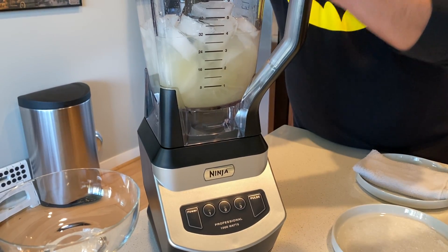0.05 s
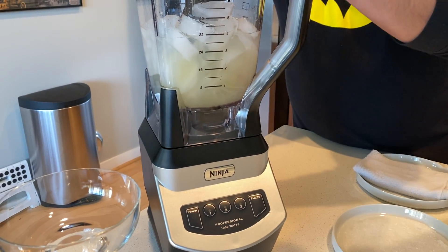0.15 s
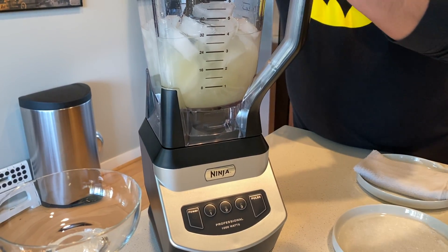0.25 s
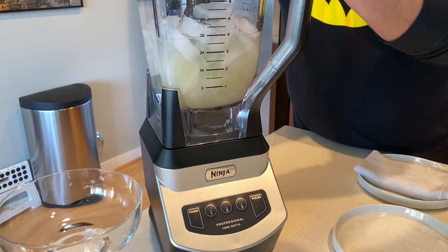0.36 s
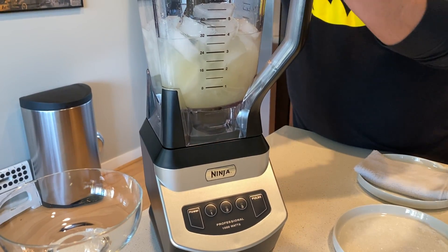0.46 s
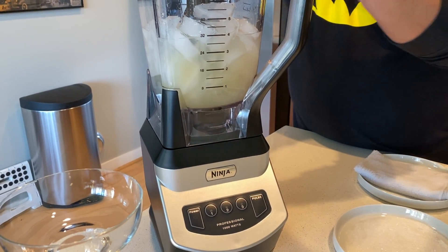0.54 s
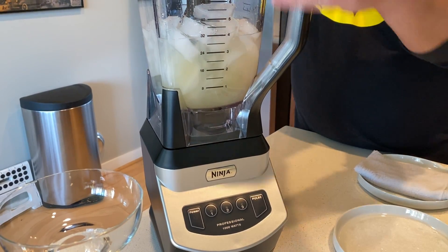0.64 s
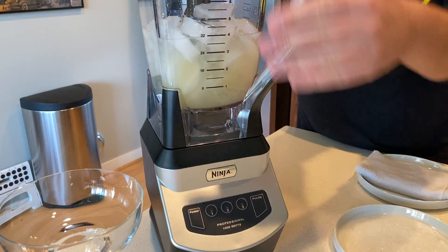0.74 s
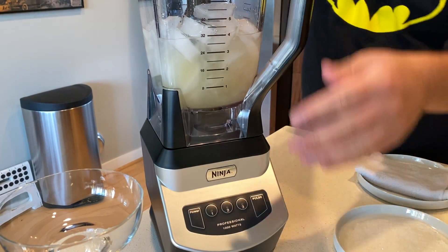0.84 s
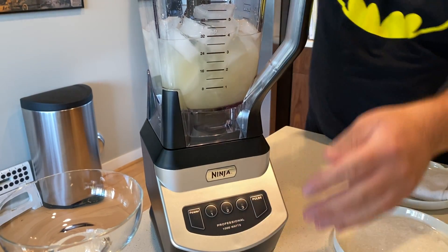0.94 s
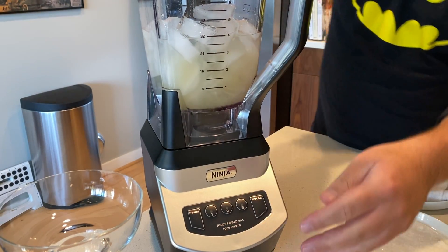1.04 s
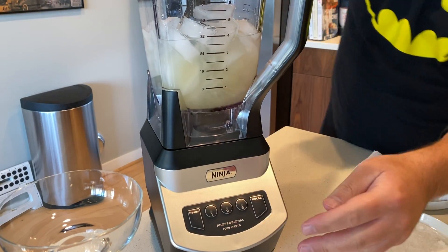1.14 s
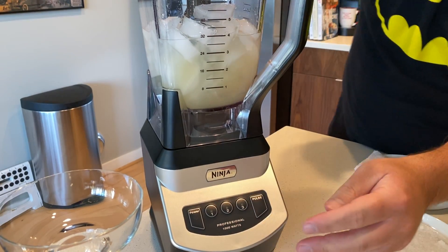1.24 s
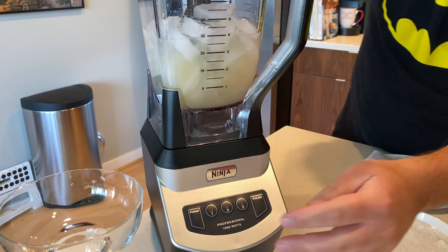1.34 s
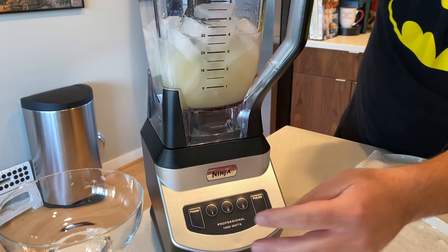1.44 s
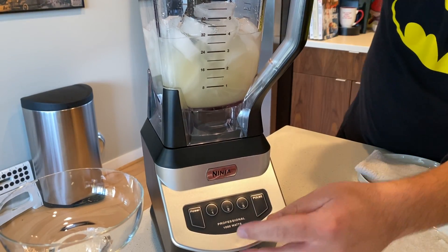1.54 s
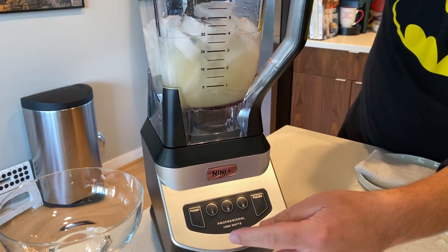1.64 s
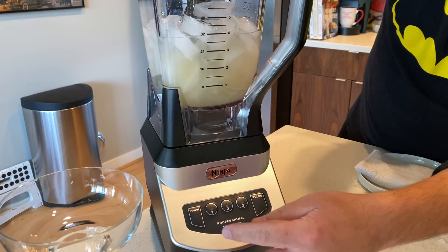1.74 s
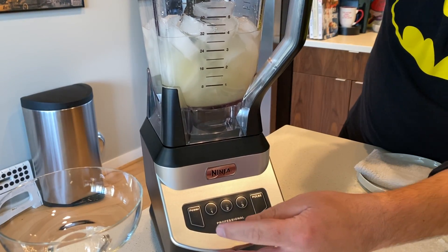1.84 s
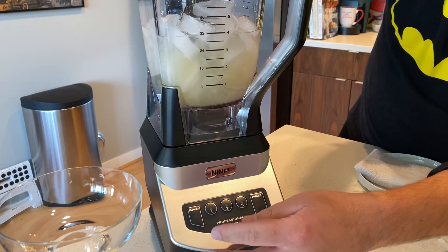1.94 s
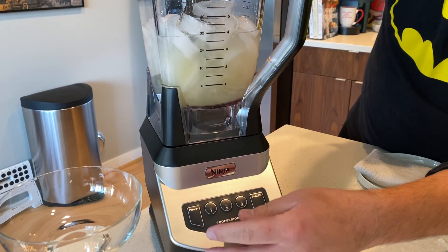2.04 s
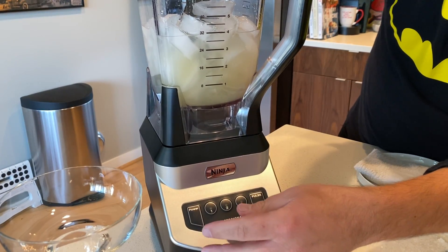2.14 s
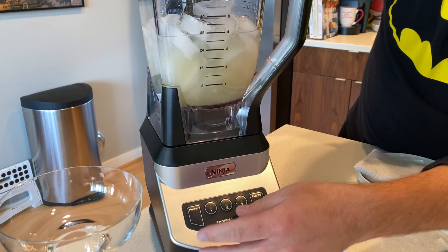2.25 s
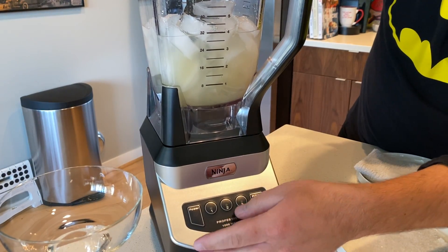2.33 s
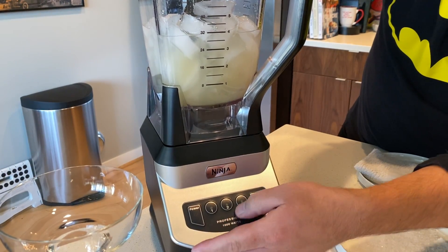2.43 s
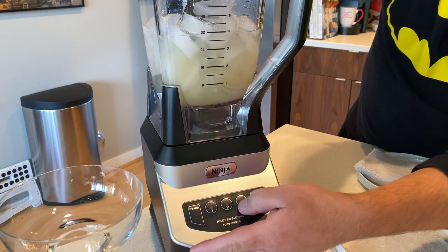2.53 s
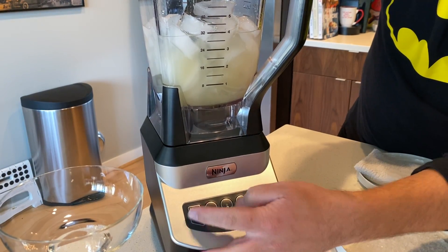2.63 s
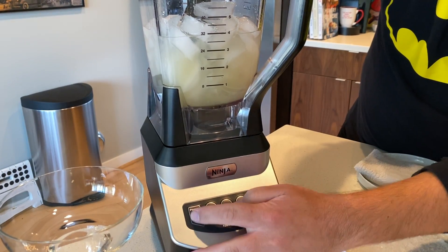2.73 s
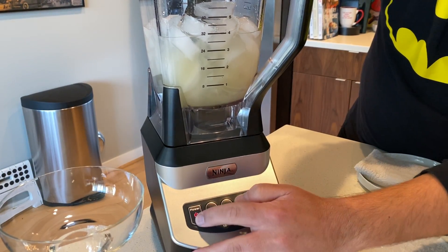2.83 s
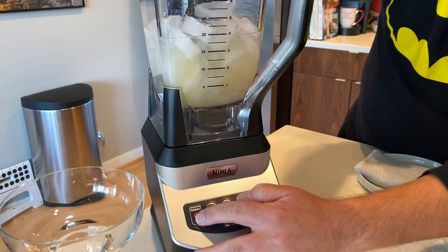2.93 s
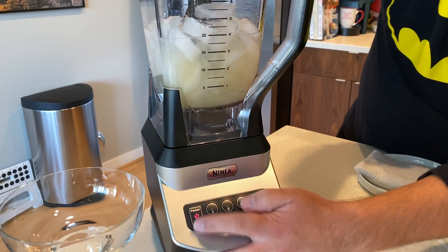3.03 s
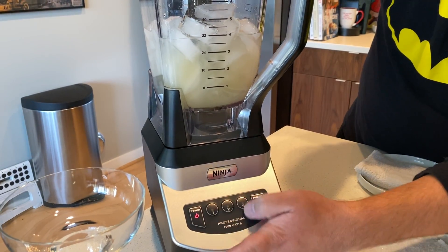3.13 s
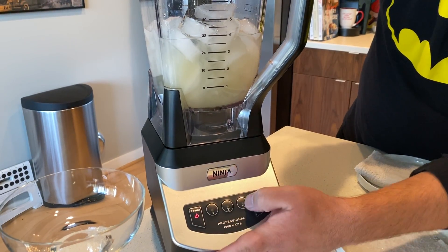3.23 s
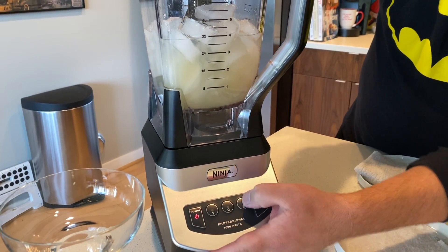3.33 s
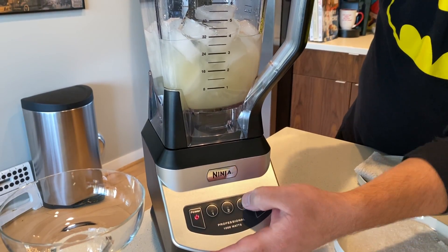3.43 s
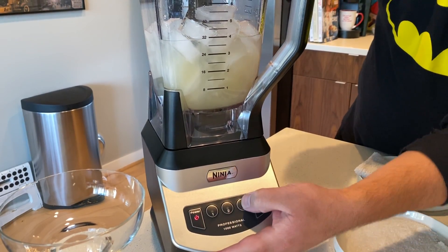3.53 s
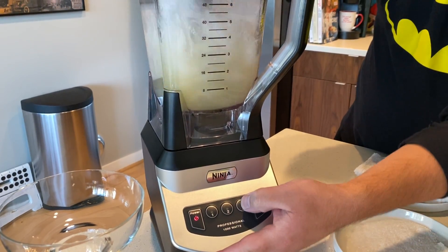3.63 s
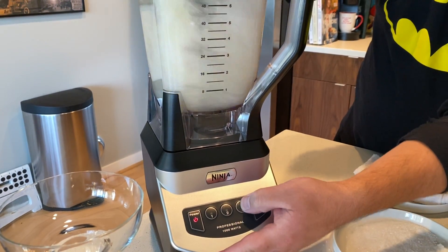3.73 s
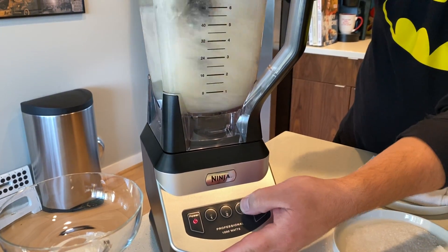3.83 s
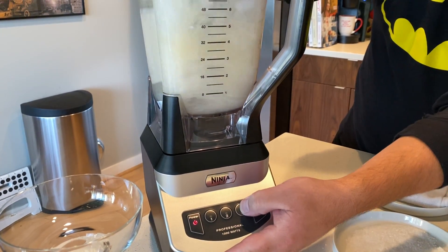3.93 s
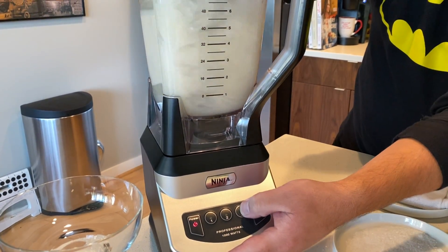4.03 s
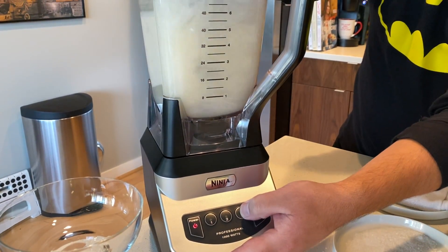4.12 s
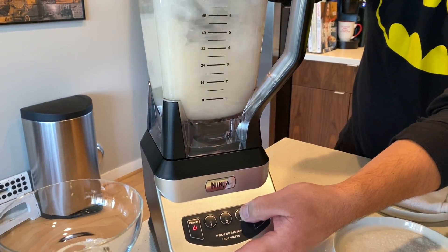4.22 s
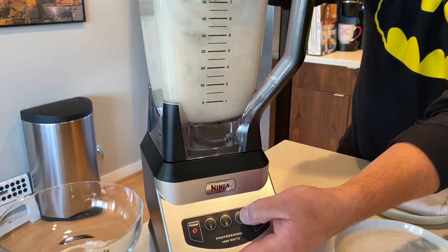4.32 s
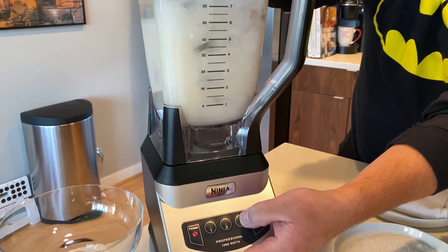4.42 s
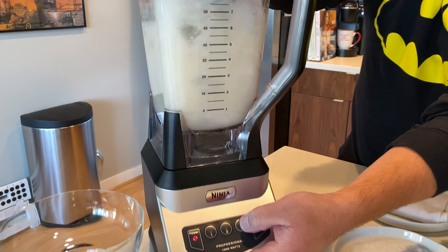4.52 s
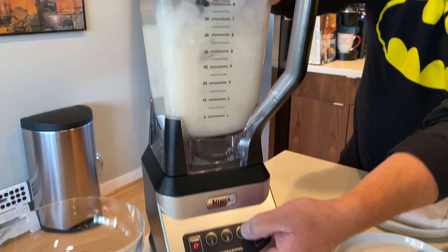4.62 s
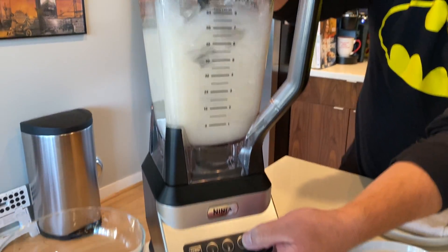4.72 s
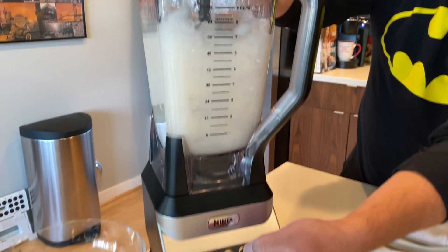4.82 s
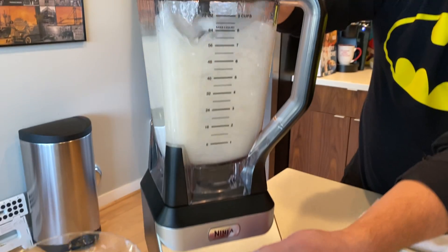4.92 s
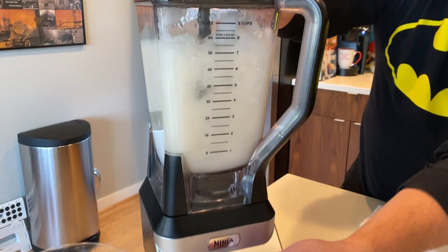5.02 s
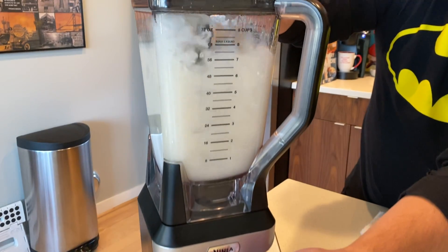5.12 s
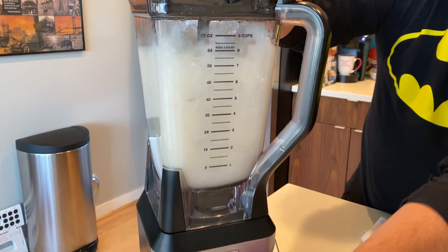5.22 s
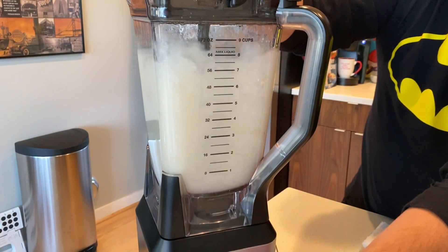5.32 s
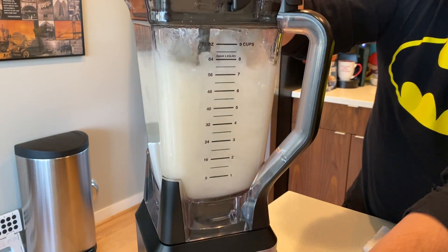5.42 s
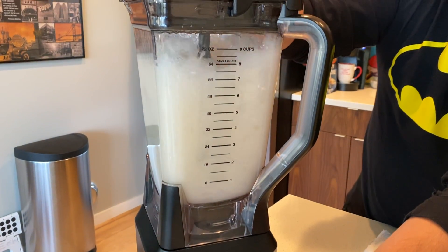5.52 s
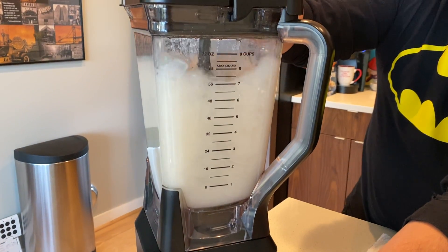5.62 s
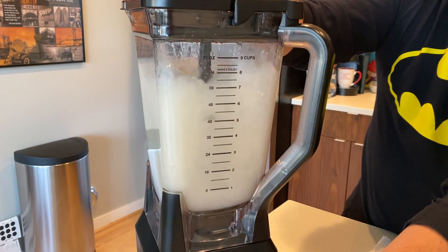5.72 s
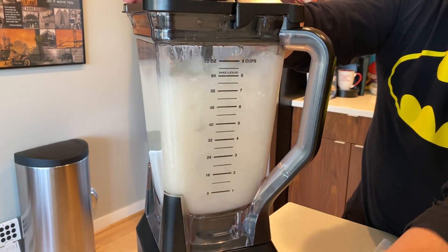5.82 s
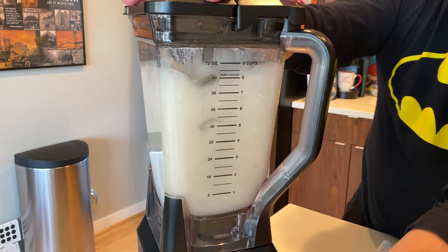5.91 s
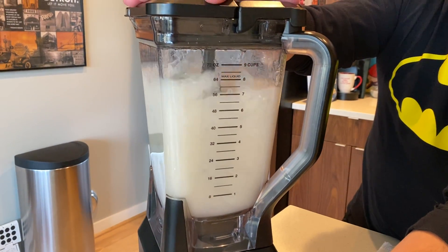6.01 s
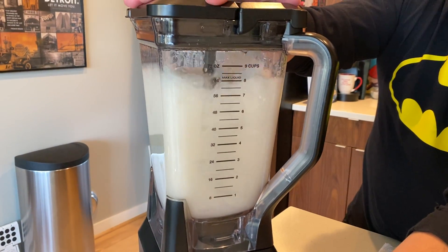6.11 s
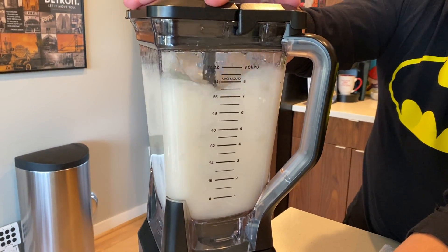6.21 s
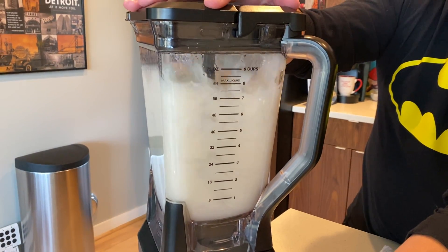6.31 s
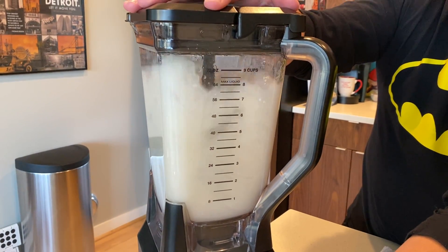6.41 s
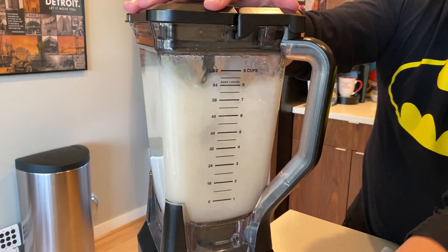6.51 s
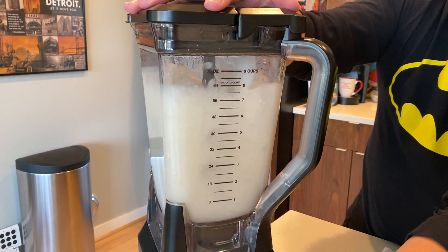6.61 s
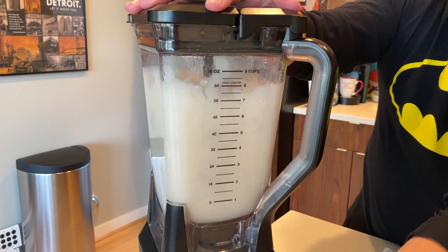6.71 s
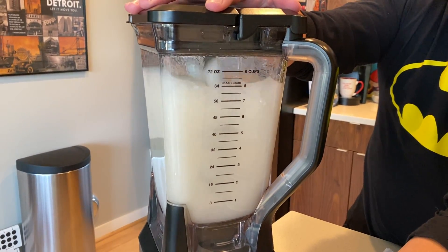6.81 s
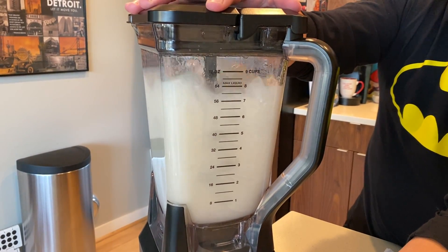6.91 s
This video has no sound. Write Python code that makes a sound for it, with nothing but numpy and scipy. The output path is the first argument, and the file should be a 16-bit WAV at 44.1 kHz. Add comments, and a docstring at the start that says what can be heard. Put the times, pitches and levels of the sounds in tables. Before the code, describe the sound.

Close stereo pickup in a lightly reverberant kitchen: cloth rustle, lid snaps, a soft plate clink and plastic button clicks with tiny hisses, over low room rumble and a distant engine. Then the blender slams on, cubes exploding against the jar. Coarse crunching thins to gritty slush, with uneven swells, hard cracks and a buzzing motor that gains speed and keeps running through the end.

```python
"""A lid scrapes and latches, cloth rustles, plates clink, buttons click with short puffs of hiss after them;
an engine drones far outside. Then a blender starts: cubes burst, and its blades grind slush, lumps and chips
(noisy impacts ringing a jar). The noise settles and the motor (shaft orders, a wavering 120 Hz hum with brief
dips, whine) gains speed as the ice gets finer. Clumps swell the grinding and hard pieces crack on the wall.
Behind: house rumble and refrigerator hum."""
import sys
import numpy as np
from scipy import signal
from scipy.fft import rfft, irfft
from scipy.io import wavfile

SR = 44100
rng = np.random.default_rng(int(sys.argv[2]) if len(sys.argv) > 2 else 0)


def store_wav(level_fs):
    """Save 16-bit WAV to argv[1]."""
    pcm = np.round(np.clip(np.atleast_2d(level_fs), -1, 1) * 32767)
    wavfile.write(sys.argv[1], SR, pcm.T.astype(np.int16))


N = 306936
T, HZ = np.arange(N) / SR, np.fft.rfftfreq(N, 1 / SR)

START_S = 3.661  # motor start
RECOVER_S = 1.02  # time constant of recovery from the ice load
# lid modes: centre_hz, width_hz, relative level_db
LID_MODES = [(706, 79, 13.5), (1328, 33, 3), (1645, 40, 9.5), (2000, 59, 5), (2260, 51, 5), (2450, 58, 1)]


def blender():
    """Motor and ice start together; ice, pieces and whine excite the room, motor tones stay dry."""
    free_hz, load_sag_hz, spin_up_s = 64.02, 9.8, .04
    jitter = .005  # rms share of speed, from the ice
    speed_hz = (free_hz - load_sag_hz * settling(RECOVER_S)) * (1 - settling(spin_up_s))
    turns = np.cumsum(speed_hz * (1 + jitter * drift(9))) / SR
    running = np.clip((T - START_S) / 0.014, 0, 1)
    noise = running * (ice(turns) + whine()) + pieces()
    return ports(kitchen(noise, wet_db=-7.5)) + running * motor(turns)


def ice(turns):
    """Blades drive slush, lumps and chips around the jar; levels fall from coarse to fine ice."""
    slush_db, lumps_db, chips_db = -33.5, -34, -27.5  # before the changes below
    coarse_slush_db, coarse_lumps_db, coarse_chips_db, coarse_s = 8, 13.5, 4, 0.14  # added at the start
    lumps_fade_db_per_s = 0.1
    coarse = settling(coarse_s)
    two_blades = 1 + .45 * np.cos(2 * np.pi * 2 * turns)
    sweep = two_blades * amp(2.2 * drift(45))  # unevenly fed

    slush = unit(band(strikes(1200, 4.3, 0.0021, 0.52, sweep), 83, 478))
    slush *= amp(slush_db + coarse_slush_db * coarse + clumps(0.81))

    lumps = unit(band(strikes(1100, 1.8, 0.0015, 0.71, sweep), 466, 1440)) * amp(lumps_db)
    lumps += unit(chunks(sweep, spread_db=2.0)) * amp(-34)
    lumps += rattle(sweep)
    fade_db = lumps_fade_db_per_s * (T - START_S)
    lumps *= amp(coarse_lumps_db * coarse - fade_db + clumps(0.16))

    chips = unit(band(strikes(1800, 3.0, 0.0041, 0.87, sweep), 1690, 15200))
    chips *= amp(chips_db + coarse_chips_db * coarse + clumps(0))

    feed = amp(0.9 * drift(22))  # ice reaches the blades in clusters
    return first_bite(sweep) + slush + lumps * feed + chips * feed ** 0.14


def first_bite(sweep):
    """A dense shower of impacts as whole cubes shatter: it sags while they last, then stops."""
    bite = unit(band(strikes(4100, 2.3, 0.0042, 0.82, sweep), 117, 16000, order=2)) * amp(-11)
    return bite * swell(START_S, 0.076, rise_db_per_s=0, sag_db_per_s=45, release_db_per_s=899)


def clumps(weight):
    """Swell in dB that clumps dragged into the blades give to ice of this weight."""
    reach = 0.36  # how far in weight a clump stirs other sizes
    # clumps: centre_s, length_s, swell_db, weight (0 light chips to 1 heavy slush)
    clump_rows = [(3.71, 0.022, 6.5, 0.07), (3.77, 0.023, 12.5, 0.58), (3.814, 0.024, 11.5, 0.38),
                  (3.91, 0.055, 8, 0.38), (4.022, 0.054, 13.5, 0.47), (4.086, 0.028, 3, 0.07),
                  (4.243, 0.055, 6, 0.48), (4.32, 0.039, 11, 0.55), (4.532, 0.026, 3, 0.86),
                  (4.725, 0.047, 5, 0.43), (5.138, 0.029, 7, 0.39), (5.159, 0.029, 8.5, 0.95),
                  (5.43, 0.18, 5, 0.54), (5.805, 0.065, 6.5, 0.48), (6.087, 0.13, 4, 0.4),
                  (6.38, 0.041, 6, 1)]
    total_db = 0
    for s, length_s, swell_db, own_weight in clump_rows:
        nearness = ((own_weight - weight) / reach) ** 2
        total_db = total_db + swell_db * np.exp(-nearness - 2 * ((T - s) / length_s) ** 2)
    return total_db


def chunks(sweep, spread_db, count=30):
    """Pieces of many sizes, each ringing for a few cycles at its own pitch."""
    per_s, low_hz, high_hz, decay_cycles = 190, 380, 2682, 9  # rate over all pitches, scaled by sweep
    out = np.zeros((2, N))
    for hz in np.geomspace(low_hz, high_hz, count):
        hit = np.flatnonzero(rng.random(N) < per_s * sweep / (count * SR))
        size = amp(spread_db * np.minimum(rng.exponential(1, len(hit)), 2))
        blows = np.zeros((2, N))
        blows[:, hit] = size * rng.choice([-1, 1], (2, len(hit)))
        out += ring(blows, [(hz, hz / (np.pi * decay_cycles), 0)]) / np.sqrt(hz)
    return jar(out)


def rattle(sweep):
    """Hard lumps of like size are batted against the wall as the blades sweep past."""
    per_s = 34  # scaled by sweep
    blows = rng.uniform(0.79, 1, N) * (rng.random(N) < per_s * sweep / SR)
    knocks = jar(contacts(blows, decay_s=0.0023, tick=0.76))
    return unit(band(knocks, 300, 2660, order=2)) * amp(-35)


def pieces():
    """Single bursts, cracks and knocks all ring the jar wall."""
    return jar(cubes() + cracks() + thumps())


def cubes():
    """Whole cubes burst at the first bite: noisy contact plus a ring of their own."""
    # bursts: hit_s, relative level_db, ring_hz
    s, db, hz = np.transpose([(3.666, -5, 854), (3.673, 2, 378), (3.683, 3, 1450), (3.6975, 3, 788),
                              (3.708, 0, 857), (3.7255, -8, 1283), (3.7375, -2, 746)])
    bursts = band(contacts(train(s, db), decay_s=0.0075, tick=0.36), 300, 12000, order=1)
    return amp(13.0) * bursts + amp(30.0) * own_rings(s, db, hz, width_hz=81)


def cracks():
    """Hard pieces flung at the wall crack, ring and splinter in the treble."""
    # cracks: hit_s, relative level_db, ring_hz, relative treble_db
    s, db, hz, treble_db = np.transpose([(3.777, -8, 1320, -22), (3.8135, -5.5, 1700, -28),
                                         (3.878, -7, 1470, -25), (3.917, -5, 2500, -30),
                                         (4.099, -14, 2480, -28), (4.132, -15, 2400, -28),
                                         (4.254, -13.5, 2520, -20), (4.3297, -10, 2570, -24),
                                         (4.6673, -10, 2100, -10.5), (4.788, -15, 2500, -28),
                                         (4.9673, -16, 2110, -10), (4.994, -10.5, 2166, -15),
                                         (5.117, -8, 2000, -23), (5.2389, -12, 2130, -29),
                                         (5.3419, -11, 2180, -33), (5.4143, -4, 2190, -17),
                                         (5.435, -13, 2100, -18), (5.471, -8.5, 2100, -24),
                                         (5.482, -13, 2650, -26), (5.6369, -11.5, 2260, -24),
                                         (5.8243, -9.5, 1870, -13), (5.8475, -13, 1990, -23),
                                         (5.931, -17, 2350, -12.5), (6.0974, -19, 1600, -32),
                                         (6.3908, -9, 2460, -13), (6.4071, -6, 2250, -7),
                                         (6.4297, -13, 2760, -26), (6.833, -15, 2240, -31),
                                         (6.861, -15, 3100, -15)])
    body = amp(18.5) * contacts(train(s, db), decay_s=0.0033, tick=0.35)
    body += amp(26) * own_rings(s, db, hz, width_hz=170)
    splinters = amp(23) * contacts(train(s, treble_db), decay_s=0.0025, tick=0.28)
    return band(body, 570, 14000, order=1) + band(splinters, 4700, 14000, order=2)


def thumps():
    """Big lumps bump the wall: a longer crumble and a pitched knock."""
    # bumps: hit_s, relative level_db, knock_hz
    s, db, hz = np.transpose([(3.83, 2, 507), (3.891, 0.5, 1386), (3.925, -3.5, 444), (4.014, 2, 1410),
                              (4.034, 0, 1355), (4.07, -2, 460), (4.213, -2, 1280), (4.235, -8, 457),
                              (4.279, -1.5, 355), (4.304, -5, 876), (4.333, -1, 454), (4.466, -4.5, 434),
                              (4.539, -3, 444), (4.698, -3.5, 347), (4.745, -3, 435), (4.99, -5.5, 334),
                              (5.054, -5.5, 361), (5.116, -5.5, 342), (5.118, -5, 1250), (5.146, -11, 820),
                              (5.787, -5.5, 840), (5.807, -6, 696), (5.901, -7, 700), (6.049, -15, 785),
                              (6.087, -5, 825), (6.099, -4, 1614), (6.351, -3.5, 254), (6.533, -5.5, 1080),
                              (6.712, -10, 327)])
    bumps = band(contacts(train(s, db), decay_s=0.015, tick=0.61), 360, 1800, order=2)
    return amp(12.5) * bumps + amp(28.5) * own_rings(s, db, hz, width_hz=43)


def strikes(per_s, spread_db, decay_s, tick, sweep):
    """Pieces of random size hit the jar, more often as a blade sweeps past."""
    size = amp(spread_db * np.minimum(rng.exponential(1, N), 4))
    hit = rng.random(N) < per_s * sweep / SR
    return jar(contacts(size * hit, decay_s, tick))


def jar(x):
    """The wall rings a little; the slush inside damps it."""
    # wall modes: centre_hz, width_hz, relative level_db
    wall_modes = [(369.5, 46, -15), (432, 38, -8), (558, 8.9, -4), (703, 7.8, -5.5), (780, 270, -6),
                  (883, 9.7, -14), (1295, 70, -11.5), (1430, 31, -7), (2170, 41, -9.5), (2686, 200, -16.5),
                  (3190, 44, -6), (3950, 290, -6.5)]
    # response of the filled jar: freq_hz, relative density_db (per Hz)
    jar_response = [(30, -93), (90, -11.5), (220, 2.5), (420, -1), (620, -5.5), (850, -3), (1750, -3),
                    (2500, 0.5), (3500, -5), (6500, -7.5), (9500, -11), (11000, -15.5), (13000, -31.5),
                    (15500, -33)]
    return colour(x + ring(x, wall_modes), jar_response)


def motor(turns):
    """Shaft orders shaken by the ice, plus a wavering, dipping magnetic hum at twice the mains rate."""
    hum_hz, hum_db, waver_db, dip_s, wander_rad = 120, -35.5, 2.5, 0.043, 0.1
    roughness = 0.41  # shaken part of each order
    # shaft orders: multiple of shaft rate, level_db
    shaft_orders = [(2, -50), (4, -33.5), (5, -39.5), (6, -47.5), (11, -49.5), (14, -47), (34, -47),
                    (36, -54), (43, -43), (53, -53)]
    # brief dips of the hum: centre_s, depth_db
    hum_dips = [(4.04, -14), (4.43, -16), (4.89, -10), (5.751, -3), (6.25, -19), (6.491, -6), (6.92, -18)]
    shaft = 0
    for k, db in shaft_orders:
        steady = np.sin(2 * np.pi * (k * turns + rng.random()))
        shaken = roughness * drift(21) * np.cos(2 * np.pi * (k * turns + rng.random()))
        shaft = shaft + amp(db) * (steady + shaken)
    shaft *= 1 - 1.06 * settling(RECOVER_S)  # tone firms up as the load evens out

    phase = 2 * np.pi * hum_hz * T + wander_rad * drift(16)
    wave = np.sin(phase) + amp(-18.0) * np.sin(3 * phase)
    dips_db = sum(db * np.exp(-((T - s) / dip_s) ** 2) for s, db in hum_dips)
    hum = amp(hum_db + waver_db * drift(17) + dips_db) * wave
    return shaft * amp([[.5], [-.5]]) + hum * amp([[-1.1], [1.1]])  # left, right dB


def whine():
    """Cooling-fan air rings the housing at a fixed pitch, louder as the motor gains speed."""
    air = ring(rng.standard_normal((2, N)), [(2680, 170, 0)])
    return unit(air) * amp(-40.5) * (1 - settling(RECOVER_S))


def handling():
    """Lid, buttons, plates and hiss: hiss and scrape stay dry, knocks excite the room."""
    knocks = lid_latches() + button_clicks() + plate_clinks()
    return rustle_and_hiss() + lid_scrape() + kitchen(knocks, wet_db=-8.5)


def lid_scrape():
    """The lid judders on its rim in random slips that ring its modes, then comes to rest."""
    slips_per_s = 760
    slips = rng.random(N) * (rng.random(N) < slips_per_s / SR)
    slips = contacts(slips, decay_s=0.0023, tick=0.67)
    scrape = unit(band(ring(slips, LID_MODES) + amp(-6) * slips, 1060, 2150, order=2)) * amp(-41)
    return scrape * swell(0, 0.085, rise_db_per_s=0, sag_db_per_s=98, release_db_per_s=123)


def lid_latches():
    """The lid snaps into place, each contact ringing its modes."""
    # latches: hit_s, relative snap_db, thud_db, treble_db
    latch_rows = [(.188, -49, -72, -49), (.206, -52, -38, -72), (.2474, -47, -33.5, -38.5),
                  (.2995, -31.5, -30, -33), (.312, -45, -47, -54), (.6775, -42.5, -59, -56),
                  (.868, -56.5, -51, -69), (1.163, -62, -44, -75), (1.193, -51, -53, -75),
                  (1.236, -60, -52, -60)]
    return clicks(latch_rows, LID_MODES, lowest_hz=660, decay_s=0.0048, noise_db=1, level_db=25.5)


def button_clicks():
    """Fingers and buttons knock the base; each click adds a ring at its own pitch."""
    # clicks: hit_s, relative snap_db, thud_db, treble_db, then ring_hz
    button_rows = [(2.531, -48, -62, -69, 1690), (2.7323, -54.5, -64, -61, 2150),
                   (2.881, -33.5, -34, -59, 1777), (3.082, -55, -37.5, -67, 825),
                   (3.493, -57, -74, -63, 2200), (3.548, -25.5, -27, -63, 1925),
                   (3.6053, -38, -33, -39.5, 500)]
    # housing modes: centre_hz, width_hz, relative level_db
    base_modes = [(256, 24, 15), (488, 35.5, 16.5), (1276, 28, 13), (2205, 42, 10), (2660, 55, 6),
                  (3480, 93, 1), (4280, 79, -5)]
    knocks = clicks(button_rows, base_modes, lowest_hz=212, decay_s=0.0072, noise_db=-2.5, level_db=27.5)
    s, snap_db, thud_db, _, hz = np.transpose(button_rows)
    return knocks + amp(38.0) * own_rings(s, np.maximum(snap_db, thud_db), hz, width_hz=51)


def plate_clinks():
    """Plates on the counter touch lightly and ring their modes."""
    # touches: hit_s, relative level_db
    clink_rows = [(1.9156, -32), (1.959, -29)]
    # plate modes: centre_hz, width_hz, relative level_db
    plate_modes = [(1950, 82, 1), (2182, 54, 5), (2950, 90, -18)]
    return amp(10.5) * band(ring(train(*np.transpose(clink_rows)), plate_modes), 1500, 3000)


def clicks(rows, modes, lowest_hz, decay_s, noise_db, level_db):
    """Plastic parts meet: a thud and a snap ring their modes, with a thin tick on top."""
    s, snap_db, thud_db, treble_db, *_ = np.transpose(rows)
    thud, snap = train(s, thud_db), train(s, snap_db)
    low = band(thud, lowest_hz, 1040, order=2)
    high = band(snap, 1470, 4600, order=2)
    ringing = ring(low + high, modes)
    body = band(contacts(thud, 0.017, 0.14), lowest_hz, 1800, order=3)
    crack = band(contacts(snap, decay_s, 0.076), 1340, 4440, order=2)
    treble = contacts(train(s, treble_db), decay_s, 0.92)
    treble = band(treble, 4300, 10600, order=4) * amp(-1.0)
    return amp(level_db) * (ringing + amp(noise_db) * (body + crack) + treble)


def rustle_and_hiss():
    """Gated noise, mixed from a dull uneven part and a bright even one."""
    rise_db_per_s, sag_db_per_s, release_db_per_s = 250, 8, 162
    # hiss rows: the early ones cloth rustle, the later ones short puffs of background hiss following clicks
    # full_strength_s, length_s, relative level_db, brightness (0-1)
    hiss_rows = [(0, 0.011, -45.5, 0), (0.308, 0.26, -51, 0.5), (0.635, 0.07, -52.5, 0.6),
                 (1.128, 0.31, -56.5, 0.48), (1.494, 0.32, -65, 0.63), (2.416, 0.057, -72, 0.27),
                 (2.542, 0.04, -56.5, 0.24), (2.74, 0.1, -59.5, 0.8), (2.893, 0.032, -55.5, 0.02),
                 (3.09, 0.025, -60, 0.75), (3.24, 0.035, -58.5, 0.77), (3.368, .05, -60, 0.6),
                 (3.557, 0.056, -53, 0.4)]
    # hiss spectrum: freq_hz, relative density_db (per Hz)
    hiss_spectrum = [(300, 7.5), (750, -3), (1100, -8), (2000, -7.5), (2600, -5.5), (3100, -9.5),
                     (5800, -9), (8000, -10.5), (10500, -13), (11600, -18), (13000, -44)]
    grain = rng.standard_normal((2, N)) * amp(1.0 * drift(70))
    dull = unit(band(unit(colour(grain, hiss_spectrum)), 190, 4700, order=2))
    fizz = colour(rng.standard_normal((2, N)), hiss_spectrum)
    fizz = unit(band(fizz, 2500, 16000, order=1))
    bright_power = dull_power = 0
    for s, length_s, db, brightness in hiss_rows:
        gain = amp(db) * swell(s, length_s, rise_db_per_s, sag_db_per_s, release_db_per_s)
        bright_share = np.clip(brightness, 0, 1) ** 2
        bright_power += gain ** 2 * bright_share
        dull_power += gain ** 2 * (1 - bright_share)
    return dull * np.sqrt(dull_power) + fizz * np.sqrt(bright_power) * amp(-7.0)


def engine():
    """A far engine through the walls: low orders, loosely in step, and a boom throbbing once a cycle."""
    scatter_turns = 0.32  # widest phase offset of an order
    # engine course: time_s, cycle_hz, relative level_db of the orders, boom_db (sixth order)
    engine_rows = [(0, 28.23, -9, -37), (.2, 28.75, 1.5, -37), (.27, 29.06, 4, -35), (.55, 29.43, 6.5, -37),
                   (.66, 29.13, 6.5, -46), (.73, 29.42, 7, -49), (.79, 29.14, 6, -36),
                   (.92, 29.5, 7.5, -55), (1.4, 30.34, 5, -55), (1.9, 30, 6, -62), (2.35, 29.71, -2.5, -55),
                   (3, 29.95, -4.5, -67)]
    # exhaust orders: multiple of cycle rate, relative level_db
    exhaust_orders = [(2, -56.5), (3, -61), (4, -63), (5, -59), (7, -56), (8, -57), (9, -60), (10, -65),
                      (12, -58), (14, -63.5)]
    cycle_hz, level_db, boom_db = curves(engine_rows)
    turns = np.cumsum(cycle_hz * (1 + 0.003 * drift(9))) / SR
    orders = 0
    for k, db in exhaust_orders:
        gain = amp(db + level_db + 2.0 * drift(4.3))
        orders = orders + gain * np.cos(2 * np.pi * (k * turns + scatter_turns * rng.random()))

    sixth, fourteenth = np.sin(2 * np.pi * 6 * turns), np.sin(2 * np.pi * 14 * turns)
    boom = sixth + amp(-20.5 + 6.1 * drift(8.6)) * fourteenth
    boom *= amp(boom_db + 2.0 * drift(22))
    boom *= 1 + 0.56 * np.cos(2 * np.pi * turns)
    return (orders + boom) * amp([[-1], [1]])  # left, right dB


def floor():
    """Dull house rumble as coloured noise, and wavering refrigerator tones."""
    # refrigerator hum: tone_hz, mean level_db
    fridge_tones = [(59.3, -51), (119.6, -55.5)]
    # rumble spectrum: freq_hz, relative density_db (per Hz)
    rumble_spectrum = [(25, -3), (40, -24), (56, 2.5), (80, -4), (120, -1), (250, -10.5), (420, -7.5),
                       (480, -20), (800, -27.5), (1200, -33.5), (2000, -38), (2600, -39.5), (3500, -51),
                       (14000, -69)]
    hum = 0
    for hz, db in fridge_tones:
        hum = hum + amp(db + 1.3 * drift(3.7)) * np.sin(2 * np.pi * (hz * T + rng.random()))
    rumble = unit(colour(rng.standard_normal((2, N)), rumble_spectrum)) * amp(-49)
    return rumble + hum


def kitchen(x, wet_db, size=22050, count=4):
    """Adds dense room reflections, each band dying at its own speed, cross-faded between tails."""
    # reverberation: freq_hz, t60_s
    room_decay = [(100, 1), (500, 0.32), (3000, 0.68), (12000, 0.47)]
    hz, t, z = signal.stft(rng.standard_normal((count, 2, size)), SR, nperseg=256)
    z = z * amp(-60 * t / read(room_decay, hz)[:, None])
    tails = signal.istft(z, SR, nperseg=256)[1]
    tails[..., :SR // 300] = 0  # gap before the first reflection
    tails *= amp(wet_db) / np.linalg.norm(tails[0, 0])
    wet = 0
    for k, tail in enumerate(tails):
        share = np.maximum(1 - abs((2 * T + k) % count - count / 2), 0)
        wet = wet + signal.fftconvolve(x * np.sqrt(share), tail, axes=1)[:, :N]
    return (x + wet) / np.sqrt(1 + amp(wet_db) ** 2)


def ports(x):
    """Two microphone ports share the bass and hear the treble with their own phase and level."""
    # likeness of the ports: freq_hz, likeness (0-1)
    port_likeness = [(100, 1), (300, 0.99), (700, 0.81), (1600, 0.47), (2400, 0.44), (4000, 0.72),
                     (5500, 0.079), (7000, 0.66), (9500, 0.9)]
    # left port leads: freq_hz, lead_rad
    left_lead = [(30, 0.5), (400, 0.5), (1200, 0.5), (1850, 0.4), (3000, 1), (5000, 1.5), (6300, 0),
                 (8300, -2.5), (10000, -7), (12000, -9.5), (14000, -12.5)]
    # left minus right: freq_hz, difference_db
    left_excess = [(100, -3), (300, -0.5), (900, 3), (2500, 0), (4000, 1), (5000, 3.5), (7000, 1),
                   (10000, 0)]
    a, b = rfft(x)
    same, tilt = np.clip(read(port_likeness, HZ), 0, 1), amp(read(left_excess, HZ) / 2)
    right = same * a + np.sqrt(1 - same ** 2) * 1j * b
    right = right * np.exp(-1j * read(left_lead, HZ))
    return irfft(np.array([a * tilt, right / tilt]), N)


def contacts(size, decay_s, tick):
    """Each impulse becomes a sharp tick and a short noisy crumble, different at the two ports."""
    keep = np.exp(-2 / (decay_s * SR))
    power = signal.lfilter([1 - keep], [1, -keep], size ** 2 + 1e-20)
    crumble = np.sqrt(power) * rng.standard_normal((2, N))
    ticks = tick * size * rng.choice([-1, 1], (2, N))
    return (crumble + ticks) / np.hypot(1, tick)


def own_rings(times_s, levels_db, pitches_hz, width_hz):
    """Each piece rings briefly at its own pitch."""
    hits = zip(times_s, levels_db, pitches_hz)
    return sum(ring(train([s], db), [(hz, width_hz, 0)]) for s, db, hz in hits)


def ring(x, modes):
    """Sum of resonant modes driven by x."""
    return sum(amp(db) * signal.lfilter(*signal.iirpeak(hz, hz / width, SR), x) for hz, width, db in modes)


def train(times_s, db):
    """Single impulses at the given times and levels."""
    x = np.zeros(N)
    x[np.round(np.asarray(times_s) * SR).astype(int)] = amp(db)
    return x


def swell(start_s, length_s, rise_db_per_s, sag_db_per_s, release_db_per_s):
    """A gain that rises to 1 at start_s, sags for length_s, then is released."""
    t = T - start_s
    rise_db = rise_db_per_s * np.minimum(t, 0)
    sag_db = sag_db_per_s * np.clip(t, 0, length_s)
    return amp(rise_db - sag_db - release_db_per_s * np.maximum(t - length_s, 0))


def settling(time_s):
    """Falls exponentially from 1 toward 0 once the motor has started."""
    return np.exp(-np.maximum(T - START_S, 0) / time_s)


def drift(rate_hz, size=4096):
    """Slow random signal of about rms 1."""
    hz = np.fft.rfftfreq(size, N / SR / size)
    slow = irfft(rfft(rng.standard_normal(size)) * np.exp(-(hz / rate_hz) ** 2), size)
    return np.interp(T, np.linspace(0, N / SR, size), unit(slow))


def colour(x, points, size=4096):
    """Minimum-phase filter with the given spectrum, so that attacks stay sharp."""
    log_gain = np.log(amp(read(points, abs(np.fft.fftfreq(size, 1 / SR)))))
    taps = np.fft.ifft(np.exp(np.conj(signal.hilbert(log_gain)))).real[:size // 2]
    return signal.oaconvolve(x, taps[None], axes=1)[:, :x.shape[1]]


def band(x, lo_hz, hi_hz, order=3):
    """Causal band-pass."""
    edges_hz = [lo_hz, min(hi_hz, .49 * SR)]
    return signal.sosfilt(signal.butter(order, edges_hz, "band", fs=SR, output="sos"), x)


def read(points, hz):
    """Interpolates a spectrum table on a log-frequency axis."""
    f, value = np.transpose(points)
    return np.interp(np.log(hz + 1), np.log(f), value)


def curves(rows):
    """The columns of a time table, sample by sample."""
    s, *columns = np.transpose(rows)
    return [np.interp(T, s, c) for c in columns]


def amp(db):
    """Decibels to linear gain."""
    return 10 ** (np.asarray(db) / 20)


def unit(x):
    """Scales to rms 1."""
    return x / np.sqrt(np.mean(x ** 2) + 1e-20)


def scene():
    """Blender, handling and background floor, with the engine outside."""
    return blender() + ports(handling() + floor()) + engine()


def record(dry):
    """Microphone bass cut, soft overload on the highest peaks, then the band limit."""
    dry = signal.sosfilt(signal.butter(4, 42, "high", fs=SR, output="sos"), dry)
    held = dry / (1 + dry ** 6) ** (1 / 6)
    low_pass = signal.firwin(511, 15800, window=("kaiser", 9), fs=SR)
    return signal.oaconvolve(held, low_pass[None], "same")


dry = scene()
out = record(dry)
store_wav(out)
```